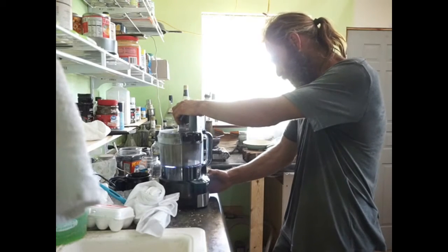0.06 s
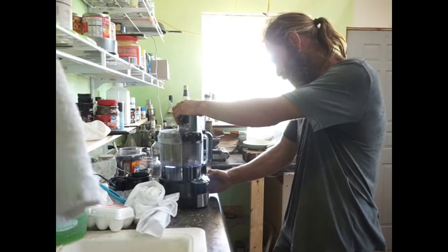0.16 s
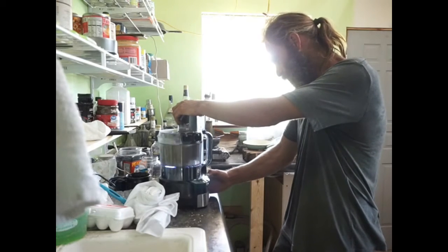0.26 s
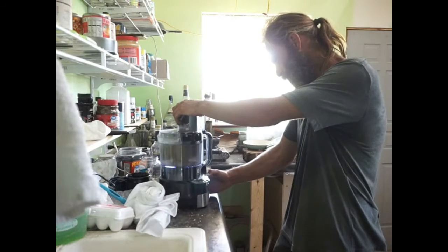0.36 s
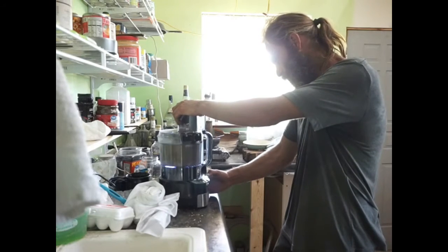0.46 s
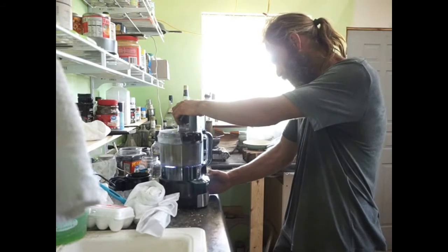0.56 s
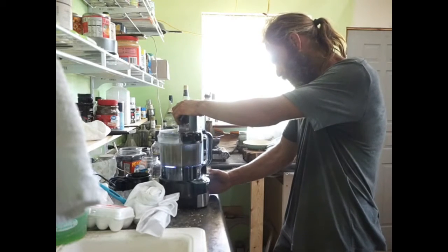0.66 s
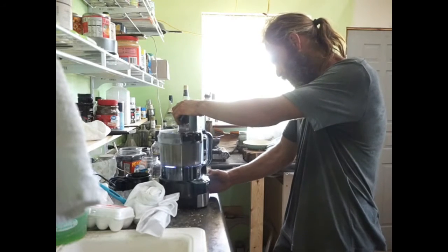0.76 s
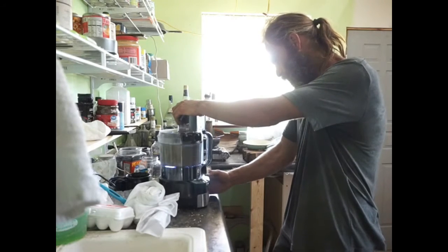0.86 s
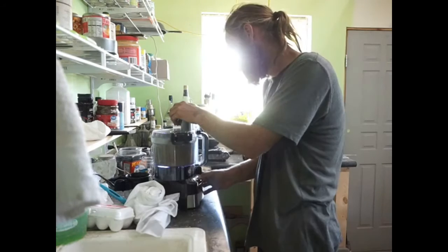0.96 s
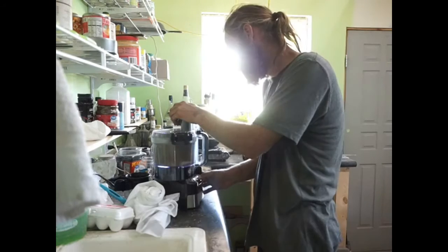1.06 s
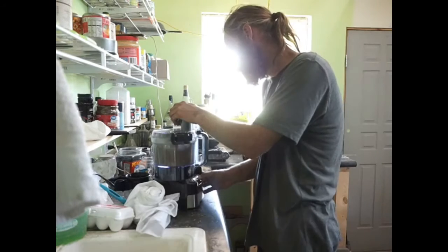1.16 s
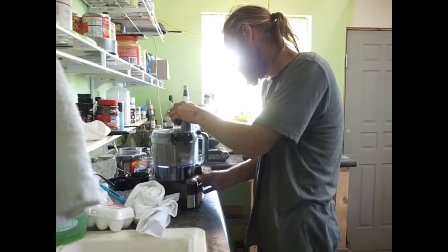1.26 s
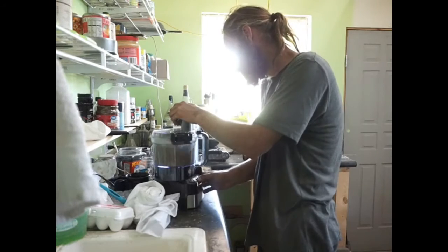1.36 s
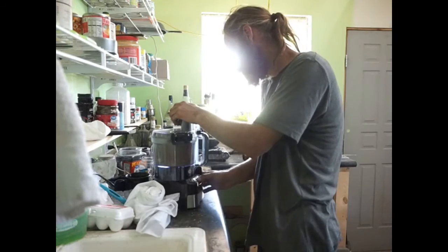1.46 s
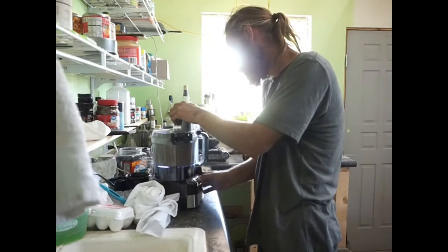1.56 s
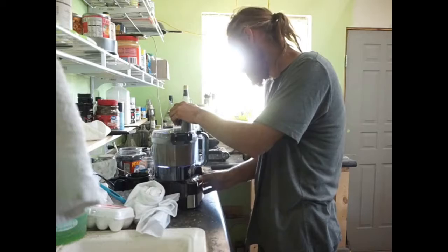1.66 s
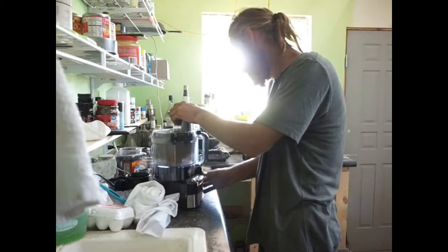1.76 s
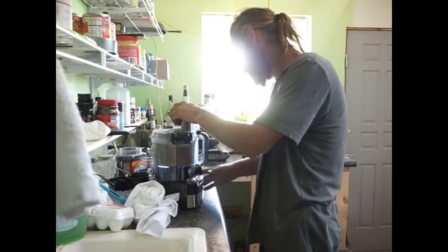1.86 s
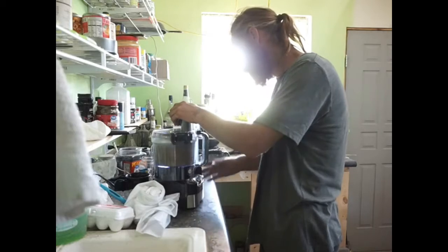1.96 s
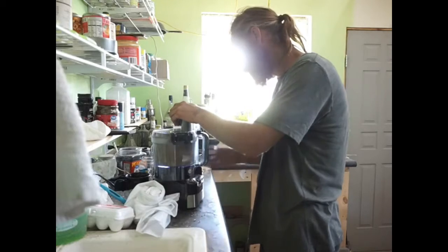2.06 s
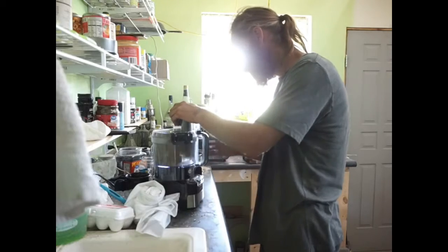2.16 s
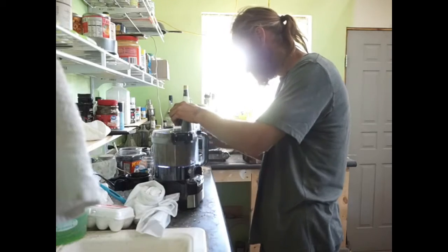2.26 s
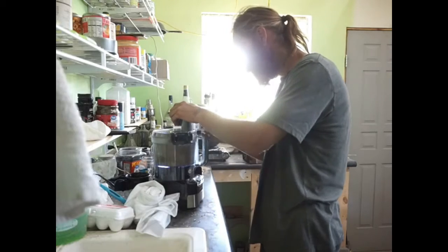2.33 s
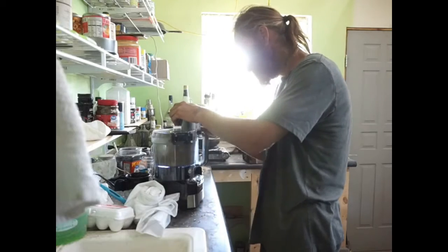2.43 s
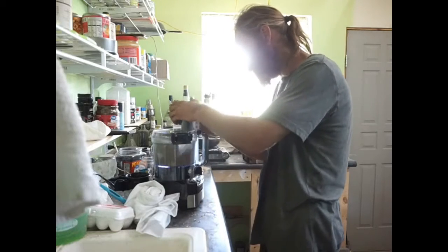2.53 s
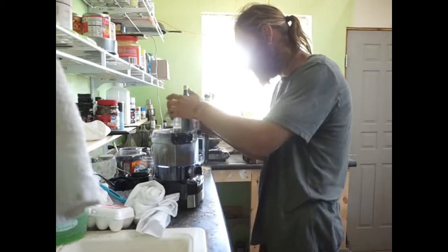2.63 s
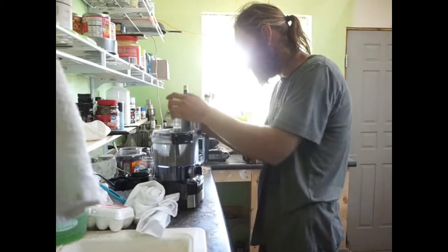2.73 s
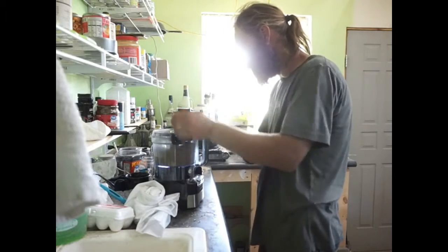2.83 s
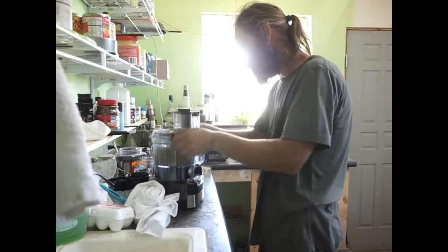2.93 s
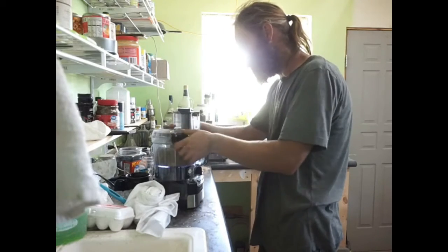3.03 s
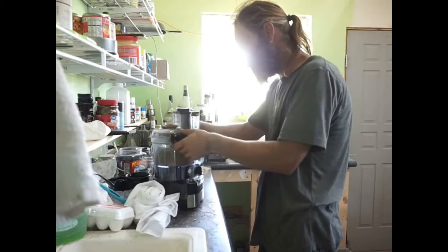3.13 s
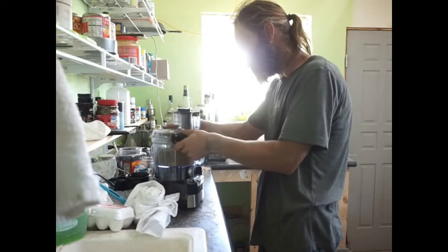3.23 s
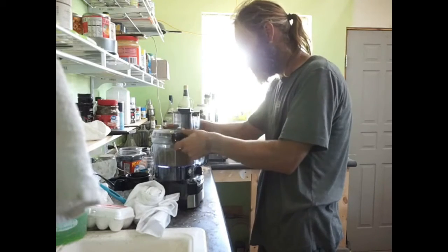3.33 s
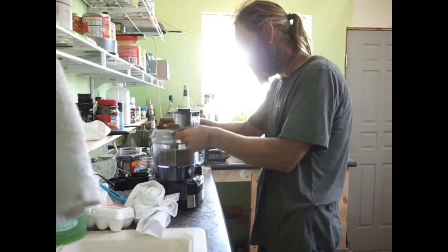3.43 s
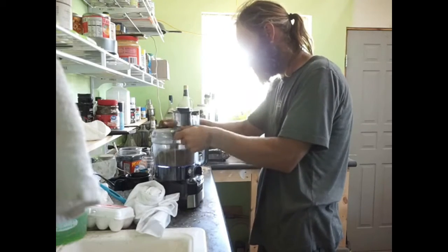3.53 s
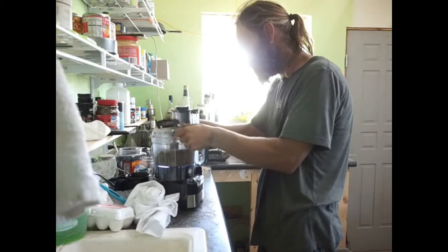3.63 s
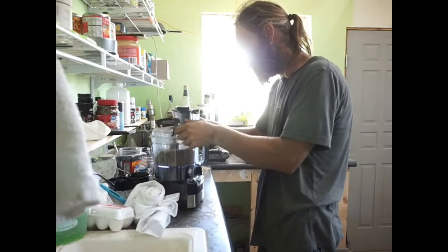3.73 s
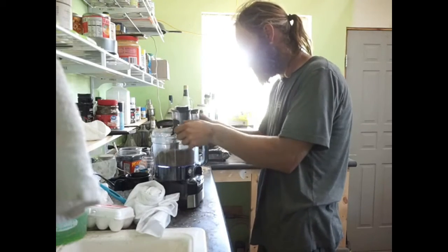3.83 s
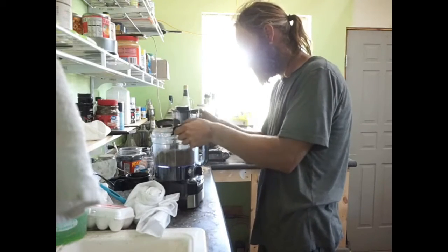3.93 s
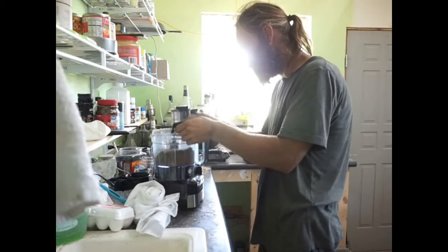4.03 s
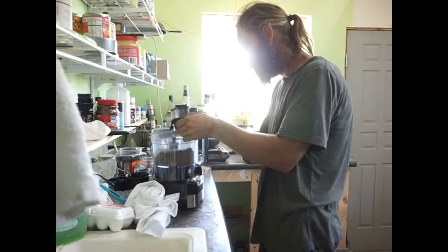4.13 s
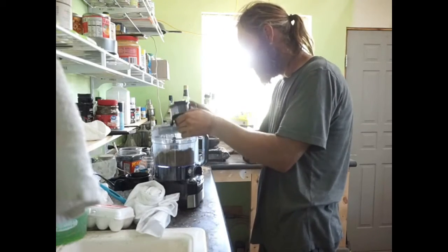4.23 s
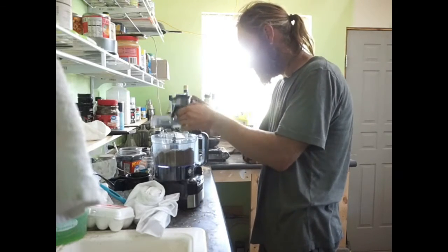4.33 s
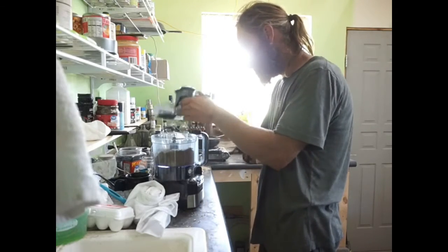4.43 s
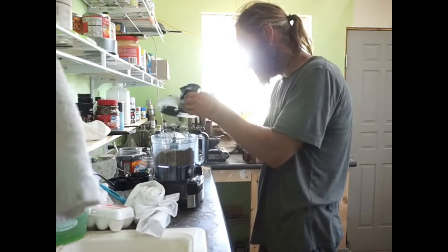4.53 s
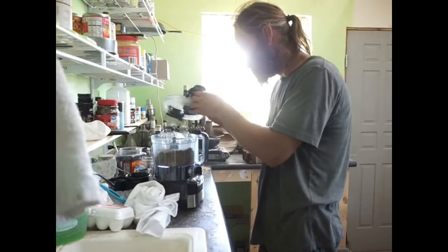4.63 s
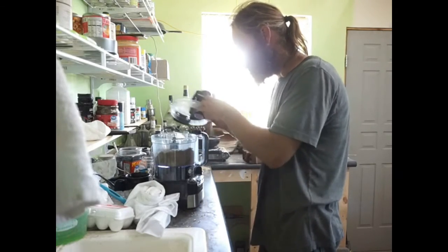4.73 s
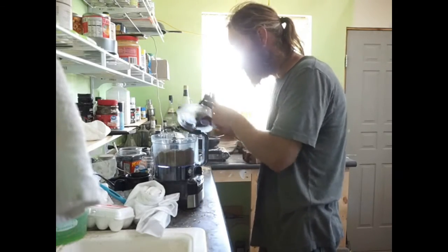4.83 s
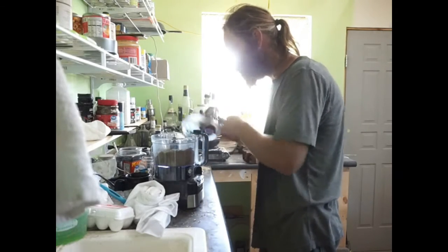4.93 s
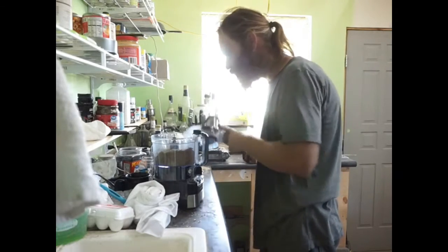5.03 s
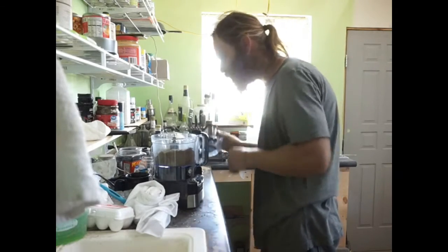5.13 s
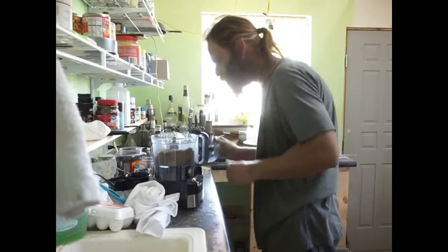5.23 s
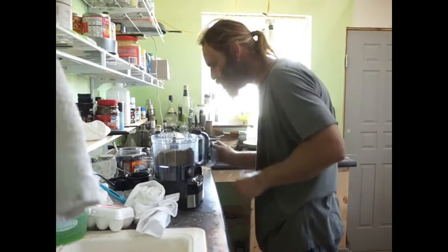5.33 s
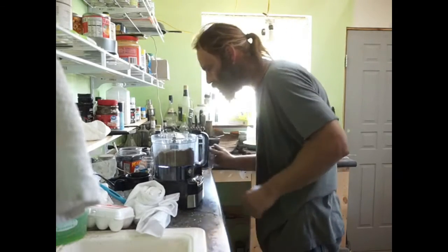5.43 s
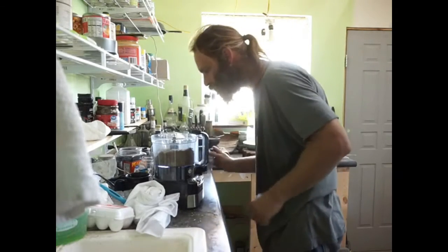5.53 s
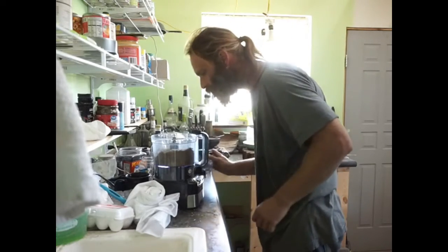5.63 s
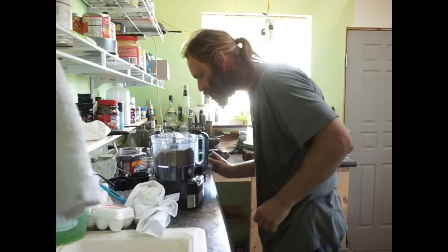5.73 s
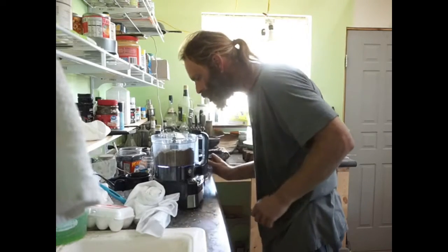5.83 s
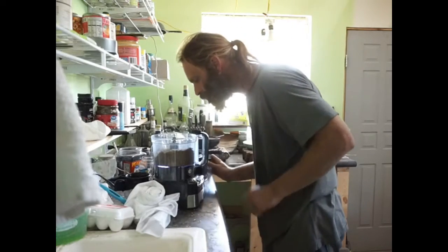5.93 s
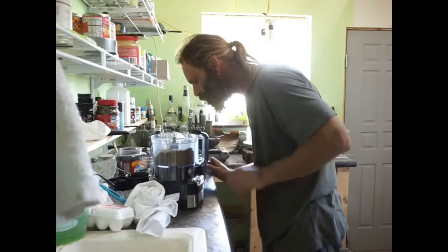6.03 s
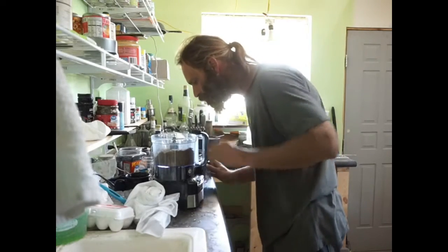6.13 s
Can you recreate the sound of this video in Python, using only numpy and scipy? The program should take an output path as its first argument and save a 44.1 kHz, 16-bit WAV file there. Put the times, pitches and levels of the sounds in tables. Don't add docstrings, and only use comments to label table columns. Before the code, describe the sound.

In a small hard kitchen, a labouring food processor winds down in falling pitch, then hands clack, rub and twist its hollow plastic parts.

```python
import sys
import numpy as np
from scipy import signal
from scipy.fft import rfft, irfft, next_fast_len
from scipy.io import wavfile
from scipy.ndimage import uniform_filter1d, map_coordinates

SR = 44100
rng = np.random.default_rng(int(sys.argv[2]) if len(sys.argv) > 2 else 0)


def how_loud(loudness_db):
    steps = np.asarray(loudness_db, float) / 20
    return 10 ** steps


def generate_wav(sig):
    pcm = np.round(np.clip(np.atleast_2d(sig).T, -1, 1) * 32767).astype(np.int16)
    wavfile.write(sys.argv[1], SR, pcm)


N = 272538

# f [Hz], t60 [s]
KITCHEN_T60 = [(200, 0.3), (1000, 0.24), (3000, 0.34), (10000, 0.32)]
# f [Hz], correlation [0-1]
ALIKE = [(60, 0.48), (140, 0.98), (350, 0.92), (830, 0.89), (2000, 0.95), (4500, 0.46), (8000, 0.54),
         (11000, 0.71)]
# f [Hz], correlation [0-1]
QUIET_ALIKE = [(60, 0.69), (170, .95), (500, 0.88), (1400, 0.26), (4000, .4), (11000, 0.23)]
# f [Hz], left minus right level [dB]
PORT_LEAN = [(60, 0), (170, 0.0), (490, -1.0), (1400, -1), (4010, -0.5), (11400, 0.5)]
# f [Hz], phase the left port leads [rad]
PORT_PHASE = [(0, 0), (600, 0.18), (3360, 0.89), (4650, 1.67), (5080, 2), (5430, -3), (5770, -5),
              (6800, -5.5), (11600, -6)]

# f [Hz], level per Hz [dB]
HUM_SPECTRUM = [(24, -78), (40, -43), (81, -41), (130, -47), (186, -33.5), (305, -14), (512, -12),
                (713, -3), (822, -7), (969, -8), (1480, -9.5), (2380, -12.5), (3810, -22.5), (10300, -40.5),
                (11300, -38), (14700, -81), (22000, -120)]
# f [Hz], width [Hz], level over the hum [dB]
HUM_PEAKS = [(80, 12, 15), (305, 16, 8), (716, 40, 2.5), (1000, 18, 9.5), (1590, 20, -23), (2820, 60, -3)]

# t [s], peak level [dB], ring f [Hz], hollowness [dB], edge [dB]
KNOCKS = [(3.4136, -21, 2300, -3, 0), (3.4222, -21, 2600, -6, 0), (3.4262, -12, 2430, -6, 2),
          (3.4305, -11.5, 2500, -12, 0), (3.4445, -20, 2400, -13, 0), (3.4674, -23, 2600, -12, 0),
          (3.8437, -33, 2000, 1, 0), (4.1652, -20, 3200, -12, 3), (4.1678, -10, 1980, -17.5, 3),
          (4.1754, -20, 1950, -16, 2), (4.1858, -20, 1920, -10.5, 2), (4.2756, -15, 2700, -14, -3),
          (4.3529, -17, 2150, -14, 0), (5.0458, -9, 2300, -18, 5), (5.3084, -36, 1300, -2, -6),
          (5.8127, -18, 2330, -7, -13), (6.0951, -8, 2240, -10, -5), (6.1091, -24, 2460, 1, 0)]
# t [s], peak level [dB], ring f [Hz], hollowness [dB], optional edge [dB]
NUDGES = [(3.0849, -31.5, 2320, -6.5), (3.252, -44, 2030, -12), (3.4915, -40, 2530, -9),
          (3.6964, -33, 2360, -1), (3.7125, -29, 2420, -5), (3.7344, -39, 1690, -10),
          (3.7584, -46, 2440, 9.5), (3.8644, -47, 2000, 2), (4.0636, -32, 2500, -6), (4.084, -27, 2370, 0),
          (4.0966, -27, 2350, -6), (4.2894, -30, 1860, -8.5), (4.4251, -32, 1620, -9),
          (4.8509, -39.5, 1780, -4), (4.9674, -54, 2010, 0), (5.0694, -24, 1860, -9),
          (5.1124, -21.5, 1830, -14), (5.1244, -33, 2080, -9), (5.32, -45, 1670, 0), (5.449, -50, 1680, 10),
          (5.8254, -23, 2350, -3.5, -8), (6.1294, -38, 2460, 5)]
# t [s], peak level [dB], ring f [Hz], hollowness [dB],
# optional edge [dB]
TICKS = [(2.6409, -21, 3300, -9), (2.642, -30, 4800, -9, -6), (2.6594, -35, 2740, 3),
         (3.2106, -40, 3300, -20, -8), (2.8, -40, 1700, -4), (3.5114, -46, 2480, -4),
         (3.9344, -43, 2460, -1), (4.2044, -31, 2000, -7), (4.573, -38, 2900, -2), (5.9015, -42, 2360, -14),
         (6.05, -40, 3000, -14), (4.0722, -46, 2600, -14), (5.9544, -40.5, 3080, 4),
         (6.0192, -38, 3060, -6)]
LID_MODES = [1770, 1925, 2000, 2320, 2500, 2700, 3000, 3340]
BOWL_MODES = [802, 1013, 1120, 1258, 1410]
# t [s], f [Hz], level [dB], t60 [s]
RINGS = [(2.455, 2780, -28, .1), (2.647, 784, -25, .08), (3.428, 2514, -26, .22), (3.43, 2700, -31, .2),
         (3.427, 1200, -21, 0.03), (3.437, 800, -27, .04), (3.487, 2480, -31, .08), (3.505, 2650, -33, .07),
         (4.354, 3200, -30, .04), (4.426, 3000, -38, .05), (4.43, 1620, -33, .05), (4.292, 780, -33, .08),
         (4.168, 3300, -24, .03), (5.895, 800, -31, .04), (5.953, 860, -35, .05), (5.975, 690, -36, .05),
         (5.992, 700, -36, .05), (6.018, 690, -35, .06), (6.052, 1170, -33, .07), (5.96, 1200, -36, .06),
         (5.9, 1170, -34, .04), (3.715, 1150, -36, .07), (5.455, 1450, -44, .08), (4.277, 2830, -22, .06),
         (4.36, 496, -35, .082), (4.435, 516, -37.5, 0.1), (5.05, 940, -23.5, 0.1),
         (5.048, 3000, -20, .052), (5.048, 1600, -21, .06), (3.428, 1300, -26, .04),
         (6.105, 381, -27.5, 0.15), (5.825, 1000, -26, .12), (5.84, 1050, -30, .06),
         (6.096, 2170, -26, 0.045), (3.855, 789, -31, .1), (4.088, 1114, -29, .055), (5.31, 950, -36, .053),
         (4.1675, 1990, -15, .03), (4.173, 1940, -17, .04), (4.184, 2000, -24, .05), (4.2, 1990, -33, .07),
         (4.284, 2600, -26, .05), (4.205, 1120, -33, .06), (3.7, 2370, -33, .09), (2.065, 2700, -27, .2),
         (5.814, 2330, -27, .08), (6.11, 480, -27, .08), (6.13, 760, -26, .08)]
# t [s], f [Hz], level [dB]
THUMPS = [
    (2.645, 199, -38),
    (3.425, 150, -47),
    (3.76, 186, -49),
    (3.93, 180, -52),
    (4.085, 192, -42),
    (4.172, 215, -43),
    (4.17, 60, -65),
    (4.28, 70, -66),
    (6.097, 70, -65),
    (5.815, 90, -66),
]

# f [Hz], level per Hz [dB]
DRAG_SPECTRUM = [(120, -67), (200, -46), (286, -19.5), (570, -10.5), (667, -4), (731, -2), (1800, -24),
                 (2340, -45), (3960, -120)]
# f [Hz], level per Hz [dB]
SCRATCH_SPECTRUM = [(880, -35), (1500, -9), (1700, -13.5), (3020, -3), (4070, -16), (4770, -11.5),
                    (10500, -29.5), (11300, -32), (14700, -60), (22000, -120)]
# f [Hz], level per Hz [dB]
TUBE_SPECTRUM = [(530, -32), (900, -10), (1150, -3), (1240, -13), (2160, 1), (3400, -5), (4030, 0.5),
                 (4920, -15), (9870, -24.5), (11200, -25), (14600, -59), (22000, -120)]
# peak t [s], rise per 20 dB [s], fall per 20 dB [s], level [dB]
DRAGS = [
    (3.72, .1, .22, -48),
    (4.05, .04, .1, -53),
    (5.06, .005, .11, -44),
    (5.83, 0.03, .06, -39),
    (5.897, 0.02, .03, -40),
    (5.96, .02, .06, -45),
    (5.995, .04, .08, -45),
    (6.028, .02, .05, -43),
    (6.08, .3, .08, -44),
    (6.125, .04, .045, -31),
]
# peak t [s], rise per 20 dB [s], fall per 20 dB [s], level [dB]
SCRATCHES = [(3.65, .06, 0.073, -50), (3.72, .06, .1, -51), (4.075, 0.044, 0.3, -52),
             (5.06, 0.0058, .1, -31.5), (6.09, .25, 0.1, -39), (5.97, .05, .08, -47), (6.03, .04, .05, -44),
             (4.175, .015, .13, -40), (4.36, .015, .12, -47), (4.44, .02, .12, -52), (3.43, .03, .1, -42),
             (5.84, .02, .04, -56)]
# peak t [s], rise per 20 dB [s], fall per 20 dB [s], level [dB]
SLIDES = [
    (3.06, .02, 0.11, -42),
    (3.095, .05, 0.07, -45),
    (3.26, 0.27, 0.065, -54.5),
]
# peak t [s], rise per 20 dB [s], fall per 20 dB [s], level [dB]
SQUEAKS = [
    (3.624, .012, .045, -33),
    (3.638, .03, .013, -33),
    (3.67, .014, 0.08, -37),
    (3.69, .04, .015, -41),
    (3.762, 0.013, .022, -41),
]

# t [s], f [Hz]
SHAFT_SPEED = [(0, 294), (.1, 298), (.2, 299.5), (.5, 303), (.66, 302), (.725, 282), (.775, 271.5),
               (.83, 276.7), (.87, 276.5), (.895, 279), (.92, 286), (.943, 288), (.944, 244.8), (1.2, 246),
               (1.29, 244), (1.385, 244.6), (1.43, 235.5), (1.52, 214.5), (1.62, 198.5), (1.7, 185),
               (1.76, 171), (1.85, 155.5), (1.91, 148), (2.06, 126.5), (2.157, 108.1), (2.3, 87.5),
               (2.4, 78), (2.9, 42.1)]
# t [s], level [dB]
EFFORT = [(0, 0), (.93, -.5), (1.34, .5), (1.77, -2.5), (1.9, -5.5), (2.05, -5.5), (2.59, -15),
          (2.77, -21.5), (2.85, -29), (3.0, -40), (3.15, -60)]
# t [s], level [dB]
BRUSH_GRIP = [(0, -1), (.05, 1), (.15, -8), (.24, 2), (.32, -2), (.38, 2), (.52, -1), (.57, 1), (.62, -2),
              (.66, 1), (.7, -3), (.725, -6), (.75, 2), (.775, 0), (.83, 7), (.862, -7), (.89, 4),
              (.91, -3), (.935, -1), (.99, 3), (1.04, -8), (1.07, -3), (1.1, -6), (1.13, 0), (1.16, -2),
              (1.2, 1), (1.25, -7), (1.32, 0), (1.39, -5), (1.405, -8), (1.43, 3), (1.455, -5), (1.48, 1),
              (1.51, -4), (1.55, 1), (1.575, -4), (1.6, 2), (1.66, -6), (1.7, 0), (1.73, 0), (1.76, 2),
              (1.79, -1), (1.82, 2), (1.85, -2), (1.91, 2), (1.95, -1), (2.0, -3), (2.06, 1), (2.12, -4),
              (2.155, -9), (2.2, -1)]
# f [Hz], level [dB]
WHINE_LEVEL = [(800, -42), (1050, -31), (1450, -27), (1800, -27), (2000, -37), (2400, -27.5), (2850, -28.5),
               (3020, -30.5)]
# f [Hz], width [Hz], level [dB]
WHINE_MODES = [(3012, 60, -0.5), (2728, 42, -6), (2450, 60, -9), (2350, 30, 1), (2245, 30, 1),
               (2120, 40, 0), (1780, 50, 4), (1490, 100, -7), (1244, 30, 0), (1010, 30, -3)]
# f [Hz], level [dB]
SHAFT_LEVEL = [(80, -92), (110, -76), (130, -57), (190, -49), (230, -46), (245, -49), (280, -48),
               (300, -43.5)]
# f [Hz], width [Hz], level [dB]
HOUSING = [(383, 16.7, 1), (506.3, 26, 0.5), (693.5, 16, 1), (909, 88, -5.5), (999, 18, -7), (1240, 20, 0),
           (1467, 31, 2.5), (1630, 67, 2), (1000, 70, -2), (1776, 33, 2.5), (2460, 52, -1), (2750, 54, -1),
           (3377, 14, 8), (9900, 490, -1)]
# f [Hz], level per Hz [dB]
BASE_SPECTRUM = [(24, -76), (40, -55), (167, -22), (293, -10), (333, -13.5), (377, -8), (800, -10.5),
                 (1040, -32), (1760, -120)]
# f [Hz], level per Hz [dB]
BOWL_SPECTRUM = [(290, -45.5), (500, -16), (577, -12), (1030, 2), (1730, -4), (2200, -19), (2860, -75),
                 (4840, -120)]
# f [Hz], level per Hz [dB]
GEAR_SPECTRUM = [(1060, -36.5), (1800, -6), (2000, -5.5), (2430, -2), (2560, -1.5), (2770, -1),
                 (3900, -7.5), (4440, -15), (4800, -18), (6240, -25.5), (10600, -120)]
# f [Hz], level per Hz [dB]
FAN_SPECTRUM = [(2470, -36), (4200, -1.5), (4820, -3), (5860, -1), (6540, -1.5), (8500, -8.5), (11000, -20),
                (18700, -120)]
# f [Hz], level per Hz [dB]
BRUSH_SPECTRUM = [(4710, -31), (8000, 0), (8680, -0.5), (10000, 4), (11200, -1), (14600, -44),
                  (22000, -120)]
# level at full effort [dB], growth with effort [dB/dB], growth with speed [dB/octave]
NOISE_LAWS = [
    (-23.1, 1.03, 0),
    (-25.5, 1.2, -2.2),
    (-29, .58, 9),
    (-39.8, 1.0, .4),
]
# peak t [s], rise per 20 dB [s], fall per 20 dB [s], level [dB], f [Hz]
BOOMS = [
    (.82, .06, .05, -33, 512),
    (.92, .14, .05, -29, 387),
]


def unit(x):
    return x / np.sqrt(np.mean(x ** 2) + 1e-20)


def along(points, hz):
    f, v = np.transpose(points)
    return np.interp(np.log(hz + 1), np.log(f + 1), v)


def curve(rows):
    return np.interp(np.arange(N) / SR, *np.transpose(rows))


def wobble(rate):
    knots = rng.standard_normal(int(N * rate / SR) + 4)
    return map_coordinates(knots, [np.arange(N) * rate / SR])


def strokes(rows):
    t = np.arange(N) / SR
    gain = np.zeros(N)
    for s, rise, fall, db in rows:
        down_db = 20 * np.maximum((s - t) / rise, (t - s) / fall)
        gain += how_loud(db - down_db) * (t > s - 0.272)
    return uniform_filter1d(gain, size=200)


def filtered(x, response):
    m = next_fast_len(x.shape[-1] + 8192)
    return irfft(rfft(x, m) * response(np.fft.rfftfreq(m, 1 / SR)), m)[..., :x.shape[-1]]


def bump(f, hz, width):
    return 1j * f * width / (hz * hz - f * f + 1j * f * width)


def lifted(f, modes, offset_db):
    return 1 + sum(how_loud(db + offset_db) * abs(bump(f, hz, width)) ** 2 for hz, width, db in modes)


def rush(spectrum, alike, peaks, peak_db):
    def shape(f):
        spread = np.arccos(np.clip(along(alike, f), -1, 1)) / 2
        tone = how_loud(along(spectrum, f)) * lifted(f, peaks, peak_db)
        return tone * np.array([np.cos(spread), np.sin(spread)])

    mid, side = filtered(rng.standard_normal((2, N)), shape)
    return unit(np.array([mid + side, mid - side]))


def patchy(x, depth_db):
    z = signal.stft(x, nperseg=512)[2]
    field = uniform_filter1d(rng.standard_normal(z.shape[1:]), size=9, axis=0)
    field = uniform_filter1d(field, size=5, axis=1)
    return unit(signal.istft(z * how_loud(depth_db * unit(field)), nperseg=512)[1][:, :N])


def room(x):
    noise = rng.standard_normal((2, SR // 3))
    noise[1] = 0.69 * noise[0] + 1.03 * noise[1]
    hz, t, z = signal.stft(noise, SR, nperseg=256)
    decay = how_loud(-60 * t / along(KITCHEN_T60, hz)[:, None])
    tail = signal.istft(z * decay, SR, nperseg=256)[1]
    late = np.pad(x, (260, 0))[None]
    return signal.fftconvolve(late, tail / np.linalg.norm(tail[0]), axes=1)


def hum():
    lean_db = -1.8 * np.array([[.5], [-.5]])
    level_db = -51 + 2.0 + wobble(3.44) / 2 + 0.16 * wobble(15) + lean_db
    return how_loud(level_db) * rush(HUM_SPECTRUM, QUIET_ALIKE, HUM_PEAKS, peak_db=-1.0)


def rings(rows, rise):
    tone = np.zeros(N + SR)
    t = np.arange(SR // 3) / SR
    for s, hz, db, t60 in rows:
        waver = np.interp(t, np.arange(30) / 70, rng.standard_normal(30))
        level = how_loud(db + 2.8 * waver - 60 * t / t60) * (1 - np.exp(-t / rise))
        tone[round(s * SR):][:len(t)] += level * np.sin(2 * np.pi * hz * t)
    return tone[:N]


def ringing_parts():
    counter = [tuple(row) + (0.073,) for row in THUMPS]  # t60, s
    dry = rings(RINGS, rise=0.0026) + rings(counter, rise=0.0042)
    return dry + how_loud(-8.5) * room(dry)[:, :N]


def contacts(rows, rise, crack, chatter, wet_db, thud_db, click_db):
    out = np.zeros((2, N + SR))
    t = np.arange(SR // 8) / SR
    fall = how_loud(-60 * t / (chatter * np.array([[1], [1.3], [1.5], [.9]])))
    force = fall * (1 - np.exp(-t / rise)) * (1 + crack * np.exp(-t / 0.0019))
    for s, db, hz, hollow_db, *edge_db in rows:
        blow = rng.standard_normal((4, len(t))) * force
        share = how_loud(2.6 * rng.standard_normal(len(LID_MODES) + len(BOWL_MODES)))

        def steep(f, c, width):
            return bump(f, c, width) ** 2

        def response(f):
            lid = sum(g * how_loud(-9 * np.log2(c / hz) ** 2) * bump(f, c, 240) for c, g in zip(LID_MODES, share))
            ring = bump(f, hz, 330) + 0.13 * lid + 0.36 * bump(f, 1800, 2416)
            walls = sum(g * 0.6 * bump(f, c, 150) for c, g in zip(BOWL_MODES, share[::-1]))
            body = walls + 0.6 * bump(f, 750, 990)
            thud = steep(f, 435, 520) * bump(f, 410, 790)
            click = steep(f, 7600, 8000)
            return np.array([ring * steep(f, 2100, 2820), body * steep(f, 940, 1400), thud, click])

        parts = filtered(blow, response)
        parts = parts / abs(parts).max(axis=1)[:, None]
        thud_level = thud_db + 1.6 * hollow_db
        click_level = click_db + sum(edge_db) - 0.48 * hollow_db
        dry = how_loud(db + np.array([-1.5, hollow_db + 0.5, thud_level, click_level])) @ parts
        wet = how_loud(wet_db) * room(dry)
        wet[:, :len(t)] += dry
        out[:, round(s * SR):][:, :wet.shape[1]] += wet
    return out[:, :N]


def rubs():
    grain = how_loud(1.1 * wobble(90) + 1.1 * wobble(460))
    drag = unit(how_loud(3 * wobble(50)) * rush(DRAG_SPECTRUM, ALIKE, [], peak_db=0))
    scratch = unit(grain * rush(SCRATCH_SPECTRUM, ALIKE, HOUSING, peak_db=2.5))
    slide = unit(grain * rush(TUBE_SPECTRUM, ALIKE, [], peak_db=0))
    return strokes(DRAGS) * drag + strokes(SCRATCHES) * scratch + strokes(SLIDES) * slide


def squeak():
    loosened = np.arange(N) / SR > 3.65
    hz = 883.4 - 19.7 * loosened + 4 * wobble(40)
    phase = 2 * np.pi * np.cumsum(hz) / SR
    tone = np.sqrt(2) * strokes(SQUEAKS) * (np.sin(phase) + how_loud(-24.5) * np.sin(2 * phase))
    return tone + how_loud(-15) * room(tone)[:, :N]


def booms():
    tone = np.zeros(N)
    for *stroke, hz in BOOMS:
        phase = 2 * np.pi * np.cumsum(hz + 3 * wobble(20)) / SR
        tone += strokes([stroke]) * np.sin(phase)
    return tone + how_loud(-12) * room(tone)[:, :N]


def motor_tones(shaft_hz, turn):
    bars_hz = 10 * shaft_hz
    whine_db = along(WHINE_LEVEL, bars_hz) + curve(BRUSH_GRIP) + 1.5 + 1.1 * wobble(49.47)
    whine = lifted(bars_hz, WHINE_MODES, 0) * how_loud(whine_db) * np.sin(10 * turn)
    teeth = np.array([[22], [32], [27], [39]])
    mesh_hz = teeth * shaft_hz
    crossing = abs(bump(mesh_hz, 2730, 188.4)) ** 2 + 0.15 * abs(bump(mesh_hz, 3010, 200)) ** 2
    mesh = how_loud([-32, -42, -43, -42]) @ (crossing * np.sin(teeth * turn))
    shaft = how_loud(along(SHAFT_LEVEL, shaft_hz) - 2.5 + 2.6 * wobble(25)) * np.sin(turn)
    fade = np.clip((2.36 - np.arange(N) / SR) / .08, 0, 1)
    tones = np.sqrt(2) * fade * (whine + mesh + shaft)
    return tones + how_loud(-15) * room(tones)[:, :N]


def motor_noise(shaft_hz, turn):
    effort_db = curve(EFFORT)
    fan_hz = np.minimum(shaft_hz, 240)
    levels = []
    for (db, grows, per_octave), hz in zip(NOISE_LAWS, [shaft_hz, shaft_hz, fan_hz, shaft_hz]):
        levels.append(db + grows * effort_db + per_octave * np.log2(hz / 245))
    bowl_db, gears_db, fan_db, brushes_db = levels
    churn = wobble(14.09)
    grain = how_loud(0.72 * wobble(250) + .8 * wobble(120))
    throb = (1 + 0.12 * np.sin(turn)) * grain
    base_db = 1.33 * effort_db - 36 + churn / 2 + 1.1 * wobble(24.7)
    base = how_loud(base_db) * rush(BASE_SPECTRUM, ALIKE, HOUSING, peak_db=-3.0)
    bowl_db = bowl_db + 0.61 * churn + 0.52 * wobble(90)
    bowl = how_loud(bowl_db) * rush(BOWL_SPECTRUM, ALIKE, HOUSING, peak_db=0)
    gears_db = gears_db + .8 * churn + 0.48 * wobble(40.07)
    gears = how_loud(gears_db) * rush(GEAR_SPECTRUM, ALIKE, HOUSING, peak_db=-9.5)
    fan_air = patchy(rush(FAN_SPECTRUM, ALIKE, [], peak_db=0), depth_db=1.56)
    fan = how_loud(fan_db + wobble(35.04)) * fan_air
    brush_hiss = patchy(rush(BRUSH_SPECTRUM, ALIKE, [], peak_db=0), depth_db=2.5)
    brushes = how_loud(brushes_db + wobble(25)) * brush_hiss
    return base + throb * (bowl + gears + fan + brushes)


def food_processor():
    shaft_hz = curve(SHAFT_SPEED)
    turn = 2 * np.pi * np.cumsum(shaft_hz * (1 + .003 * wobble(70))) / SR
    return motor_tones(shaft_hz, turn) + motor_noise(shaft_hz, turn) + booms()


def scene():
    knocks = contacts(KNOCKS, rise=0.00088, crack=2.2, chatter=0.066, wet_db=-5.5, thud_db=-9.5, click_db=-38)
    nudges = contacts(NUDGES, rise=0.0048, crack=.1, chatter=0.065, wet_db=-3, thud_db=-19, click_db=-33)
    ticks = contacts(TICKS, rise=0.003, crack=.1, chatter=0.064, wet_db=-2.5, thud_db=-11, click_db=-18.5)
    hands = knocks + nudges + ticks + ringing_parts() + rubs() + squeak()
    return hum() + hands + food_processor()


def treble_gaps(x):
    hz, _, z = signal.stft(x, SR, nperseg=1024)
    bins = 17
    luck = rng.random((len(hz) // bins + 1, z.shape[2] // 2 + 1)) < .11
    empty = np.repeat(np.repeat(luck, bins, axis=0), 2, axis=1)[:len(hz), :z.shape[2]]
    treble = hz > 6100
    loud = uniform_filter1d(abs(z[0, treble]).mean(axis=0), size=30) > how_loud(-84)
    gain = np.where(empty & treble[:, None] & loud, how_loud(-40), 1)
    return signal.istft(z * gain, SR, nperseg=1024)[1][:, :N]


def low_pass(x):
    return signal.sosfilt(signal.butter(12, 12050, fs=SR, output="sos"), x)


def record(dry):
    side = np.array([[.5], [-.5]])

    def port(f):
        band = (f < 11030) * f ** 2 / (f ** 2 + 50.0 ** 2)
        return band * how_loud(side * along(PORT_LEAN, f)) * np.exp(1j * side * along(PORT_PHASE, f))

    mix = treble_gaps(filtered(dry, port))
    return low_pass(mix)


dry = scene()
out = record(dry)
generate_wav(out)
```